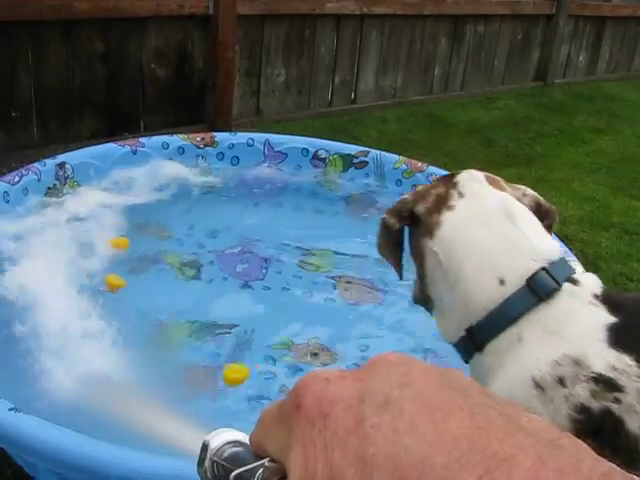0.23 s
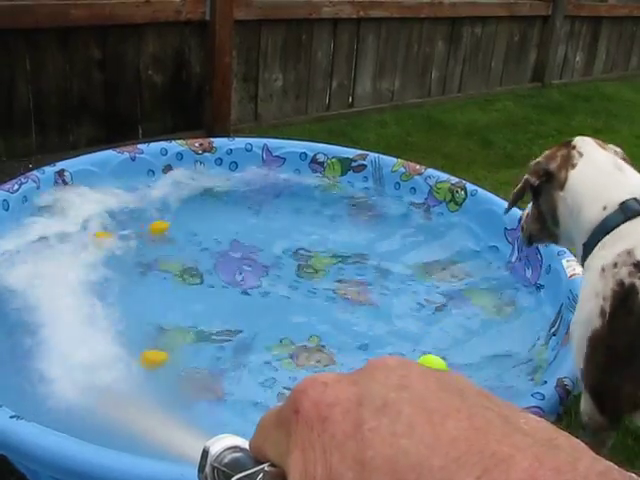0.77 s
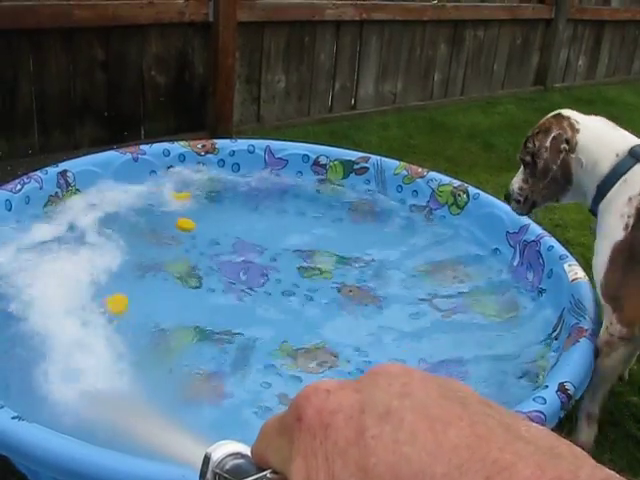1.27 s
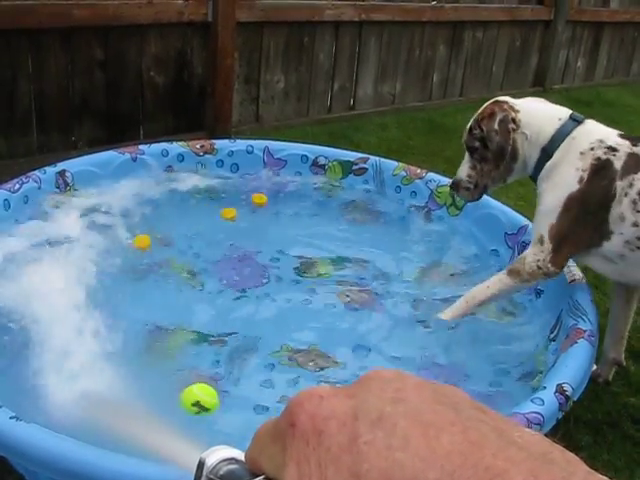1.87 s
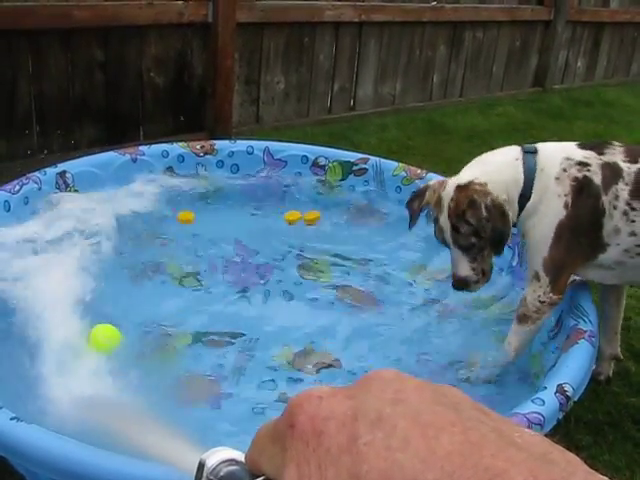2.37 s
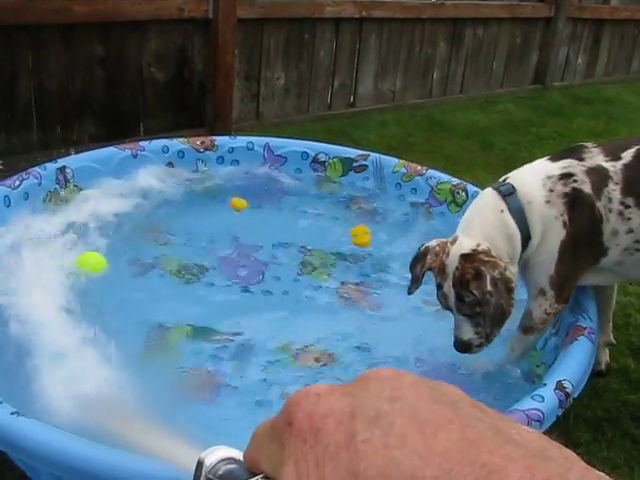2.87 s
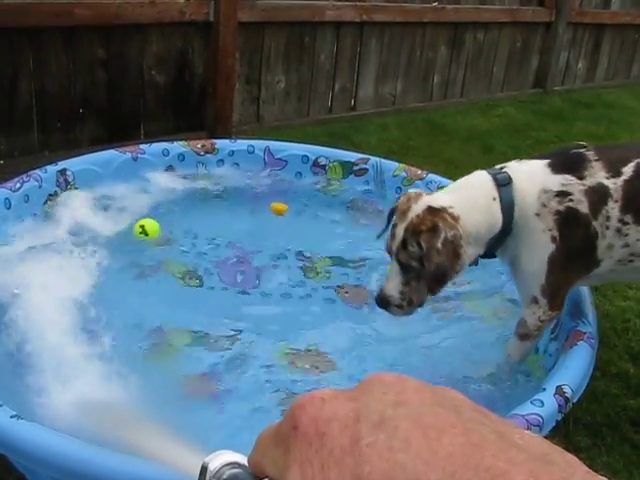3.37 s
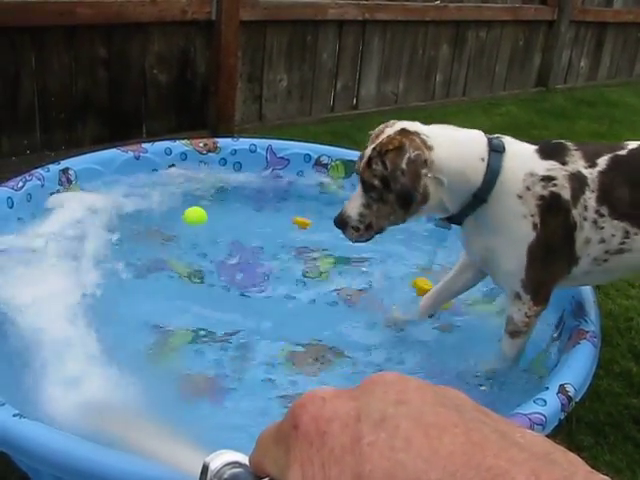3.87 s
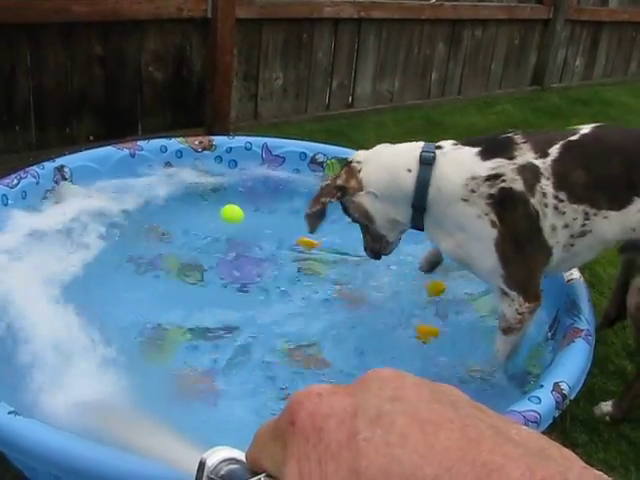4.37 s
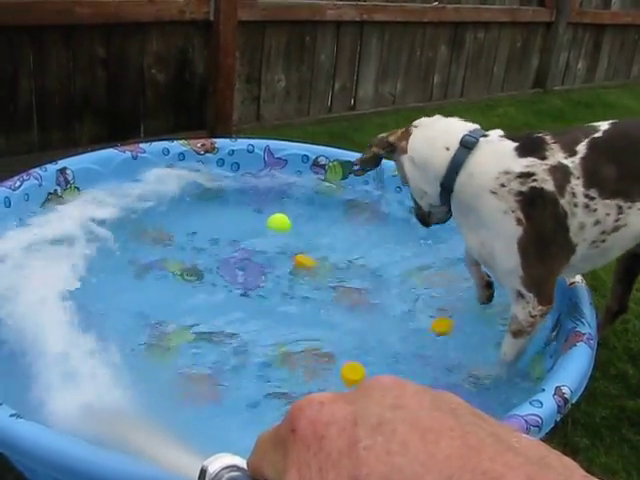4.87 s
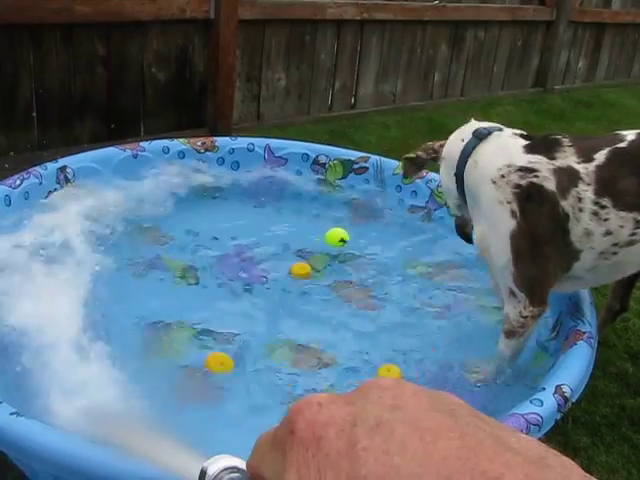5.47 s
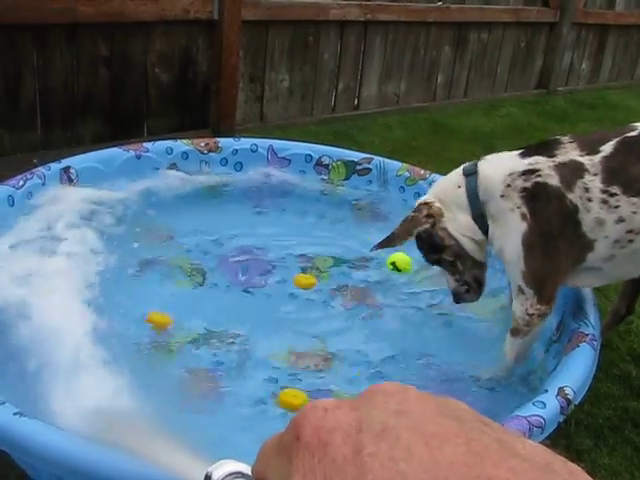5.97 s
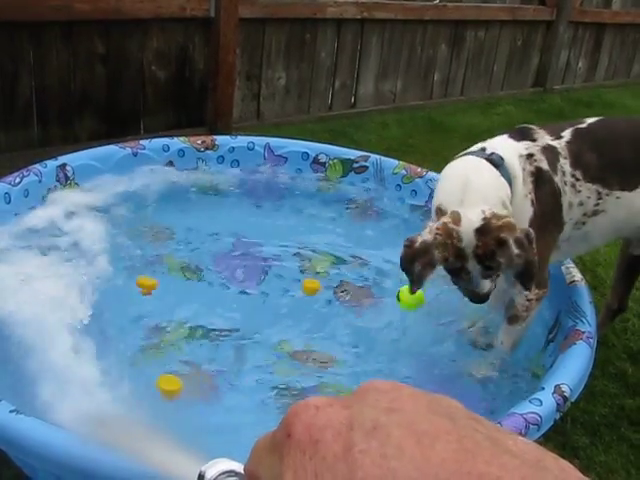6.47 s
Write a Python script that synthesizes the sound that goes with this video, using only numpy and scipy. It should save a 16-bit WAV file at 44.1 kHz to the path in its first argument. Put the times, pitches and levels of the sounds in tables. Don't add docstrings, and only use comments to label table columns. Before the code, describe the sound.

A hose nozzle hisses loudly and steadily close by, its jet fizzing into a shallow plastic pool with crackling spits and bubbling plops.

```python
import sys
import numpy as np
from scipy import signal
from scipy.io import wavfile
from scipy.ndimage import uniform_filter1d

SR = 44100
rng = np.random.default_rng(int(sys.argv[2]) if len(sys.argv) > 2 else 0)


def level_to_linear(level):
    exponent = np.asarray(level, float) / 20
    return 10 ** exponent


def generate_wav(sig):
    pcm = np.round(np.clip(np.atleast_2d(sig).T, -1, 1) * 32767).astype(np.int16)
    wavfile.write(sys.argv[1], SR, pcm)


N = 296793


def evened(x):
    return x / np.sqrt(np.mean(x ** 2) + 1e-20)


def coloured(x, points):
    hz = np.fft.rfftfreq(4096, 1 / SR)
    f, db = np.transpose(points)
    level_db = np.interp(np.log(hz + 1), np.log(f), db)
    log_gain = np.log(level_to_linear(np.maximum(level_db, -100)))
    circle = np.r_[log_gain, log_gain[-2:0:-1]]
    taps = np.fft.ifft(np.exp(np.conj(signal.hilbert(circle)))).real
    return signal.oaconvolve(x, taps)[:N]


def patchy(patch_db, patch_hz, patch_s, flicker_db):
    frames, bins = N // 64 + 8, 129
    real, imag, seeds = rng.standard_normal((frames, bins, 3)).T
    spectrum = np.fft.fft2(seeds)
    across = np.fft.fftfreq(bins, SR / 256)[:, None]
    along = np.fft.fftfreq(frames, 64 / SR)
    blur = np.exp(-(across * patch_hz) ** 2 - (along * patch_s) ** 2)
    patches = evened(np.fft.ifft2(spectrum * blur).real)
    flicker = evened(np.fft.ifft(spectrum[0] / (1 + (along * 0.02) ** 2)).real)
    cells = (real + 1j * imag) * level_to_linear(patch_db * patches + flicker_db * flicker)
    return evened(signal.istft(cells, nperseg=256, noverlap=192)[1][:N])


def droplets(per_s, spread_db):
    size = level_to_linear(spread_db * np.minimum(rng.exponential(1, N), 5))
    impacts = size * rng.choice([-1., 1.], N)
    return evened(impacts * (rng.random(N) < per_s / SR))


def swells(times, lifts_db, lengths):
    t = np.arange(N // 64 + 2) * 64 / SR
    bells = np.exp(-((t[:, None] - times) / lengths) ** 2) @ lifts_db
    return np.interp(np.arange(N) / SR, t, bells)


# [f/Hz, level/dB per Hz]
HISS_SPECTRUM = [(500, -56.5), (1200, -18), (1600, -17), (1950, -12), (2150, -13), (2700, -7.5), (2880, -7),
                 (3300, -3), (4150, 1.38), (4450, 1), (4800, -4.5), (5150, -10.5), (5500, -10),
                 (5900, -31.5)]
# [t/s, gain drop that follows/dB]
SPITS = [(0.296, 0.5), (0.359, 1), (0.462, 2.5), (0.872, 2), (1.033, 1.5), (1.12, 3), (1.391, 1.5),
         (1.432, 0), (1.729, 3), (1.883, 1), (2.013, 5.5), (2.117, 3), (2.287, 2.5), (2.443, 5.5),
         (2.989, 1), (3.086, 5), (3.353, 0.5), (3.487, 4), (3.769, 3), (4.211, 2.9), (4.395, 0.5),
         (4.74, 4), (4.95, 1.5), (5.088, 1.5), (5.421, 2.5), (5.683, 0), (5.95, 2.5), (6.108, 2),
         (6.283, 3.5)]
# [t/s, spray lift/dB, plunge lift/dB]
SURGES = [(.19, 1.5, 3), (.68, 0.4, 0), (1.28, 1.3, 2), (1.58, .3, 1.5), (2.24, 0.8, 2.5), (2.75, 1.3, 2.5),
          (2.95, 1, 2.5), (3.28, 0.2, 3), (3.56, 0.9, 2), (4.33, 1, 3), (4.62, 0.5, 1.5), (4.86, 1, 4),
          (5.22, -0.1, 0.5), (5.6, 0.2, 1.5), (6.08, 1.1, 1.5), (6.23, 1.5, 4), (6.45, 0.8, 5.5),
          (6.66, 0, 5.5)]
SURGE_S = 0.078


def nozzle():
    drive = patchy(patch_db=0.53, patch_hz=1500, patch_s=0.049, flicker_db=0.5)
    drive = drive + 0.57 * droplets(per_s=6000, spread_db=3.0)
    for s, drop_db in SPITS:
        drive[round(s * SR)] += level_to_linear(20.5 + 0.4 * drop_db)
    times, spray_db, _ = np.transpose(SURGES)
    level_db = -23.5 + swells(times, spray_db, SURGE_S)
    return level_to_linear(level_db) * evened(coloured(drive, HISS_SPECTRUM))


def bubble(hz, cycles, glide):
    u = np.arange(round(3 * cycles / hz * SR)) * hz / SR / cycles
    envelope = (1 - np.exp(-u / 0.061)) * np.exp(-1.8 * u)
    return envelope * np.sin(2 * np.pi * cycles * (u + glide * u ** 2))


# [f/Hz, level/dB per Hz]
FOAM_SPECTRUM = [(260, -49.5), (450, -14), (635, -14), (805, -9), (1260, -6), (1590, -6), (2500, 1.5),
                 (3250, -28), (5500, -120)]
# [f/Hz, level/dB per Hz]
SLOSH_SPECTRUM = [(24, -36), (40, -13), (81, 0.5), (118, -4), (232, -1), (268, 1), (480, -4), (620, -29),
                  (1060, -120)]
# [t/s, lift/dB, length/s]
WAVES = [(.3, 2, 0.13), (0.756, 4.5, .25), (1.27, 8.5, .15), (1.6, 2, .2), (2.753, 3.5, 0.22),
         (3.274, 10, 0.12), (3.55, 3, 0.14), (4.62, 6, 0.13), (5.3, 4, 0.17), (5.55, 2.5, .12),
         (6.1, 4, .1), (6.395, 6, .1), (6.682, 6.5, 0.16)]


def pool():
    wash = patchy(patch_db=1.8, patch_hz=900, patch_s=0.23, flicker_db=0.0)
    gulps = level_to_linear(5.5 * evened(uniform_filter1d(rng.standard_normal(N), size=400)))
    swarm = np.zeros(N)
    for hz in np.geomspace(520, 2600, num=24):
        size = level_to_linear(1.5 * np.minimum(rng.exponential(1, N), 4))
        births = size * (rng.random(N) < 40 * gulps / SR)
        ringing = signal.oaconvolve(births, bubble(hz, cycles=6.4, glide=0.11))[:N]
        swarm += ringing * hz ** 0.5
    spatter = 0.45 * droplets(per_s=130, spread_db=6.0)
    foam = 0.87 * evened(coloured(wash + spatter, FOAM_SPECTRUM)) + 0.59 * evened(swarm)
    slosh = evened(coloured(wash, SLOSH_SPECTRUM))
    times, _, plunge_db = np.transpose(SURGES)
    foam_db = -43 + swells(times, plunge_db, SURGE_S)
    slosh_db = -62.5 + swells(*np.transpose(WAVES))
    return level_to_linear(foam_db) * foam + level_to_linear(slosh_db) * slosh


# [t/s, peak level/dB, f/Hz]
BUBBLES = [(0.07, -25.5, 1500), (0.42, -26, 1320), (0.448, -28, 887), (0.788, -31, 1180),
           (1.229, -39, 1130), (1.299, -25, 1320), (1.41, -21, 1395), (1.75, -28.5, 1190),
           (1.829, -25.5, 1476), (1.868, -30, 1070), (1.978, -36.5, 1260), (2.053, -26, 1180),
           (2.102, -32, 1290), (2.354, -28.5, 1250), (2.579, -26.5, 1360), (2.631, -28, 1130),
           (2.694, -37, 1360), (2.778, -26, 1370), (3.066, -30, 1280), (3.349, -26, 1350),
           (3.479, -23.5, 1500), (3.951, -29, 1205), (4.579, -23.5, 1340), (4.826, -27, 1206),
           (5.029, -25.5, 1270), (5.195, -30, 1270), (5.231, -24, 1150), (5.609, -27.5, 1520),
           (6.028, -26.5, 1000), (6.222, -29, 1400)]


def plops():
    out = np.zeros(N + SR)
    sprays = rng.standard_normal((len(BUBBLES), 600))
    band = signal.butter(2, [600, 2000], "band", fs=SR)
    for (s, db, hz), spray in zip(BUBBLES, sprays):
        burst = spray * signal.windows.hann(600) ** 2
        splash = level_to_linear(db - 19) * evened(signal.lfilter(*band, burst))
        ring = level_to_linear(db - 5.5) * bubble(hz, cycles=14.0, glide=0.063)
        for part in (ring, splash):
            out[round(s * SR) - 60:][:len(part)] += part
    return out[:N]


def scene():
    return (nozzle() + pool() + plops())[None]


def gain_control(x):
    t, drop = np.arange(N) / SR, np.zeros(N)
    for s, drop_db in SPITS:
        after = np.maximum(t - s - 0.0015, 0)
        drop += drop_db * (1 - np.exp(-after / 0.0024)) * np.exp(-after / 0.046)
    return x * level_to_linear(0.26 - drop)


# [f/Hz, level/dB]
SMOOTHING = [(4000, 0), (4500, 0), (5000, -0.5), (5512, -3), (6000, -11), (6500, -23.5), (6800, -35),
             (7000, -41.5), (7250, -60.5), (7500, -83)]


def coarse_sampling(x):
    kept = 4 * (np.arange(N) % 4 == 0)
    hz = np.linspace(0, SR / 2, num=257)
    f, db = np.transpose(SMOOTHING)
    taps = signal.firwin2(401, hz, level_to_linear(np.interp(hz, f, db)), fs=SR)
    return signal.oaconvolve(kept * x, taps[None], "same")


def band_limit(x):
    return signal.sosfilt(signal.butter(12, 7380, fs=SR, output="sos"), x)


def record(dry):
    x = gain_control(dry)
    x = x / (1 + (abs(x) / 0.21) ** 8) ** (1 / 8)
    mix = coarse_sampling(x) - 0.0064
    return band_limit(mix)


dry = scene()
out = record(dry)
generate_wav(out)
```